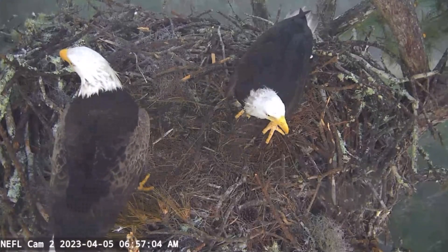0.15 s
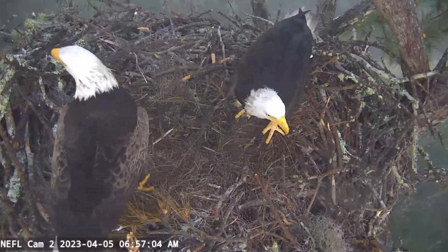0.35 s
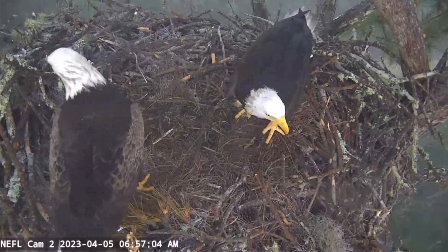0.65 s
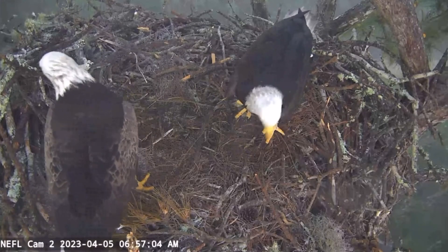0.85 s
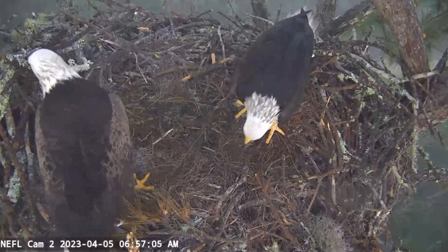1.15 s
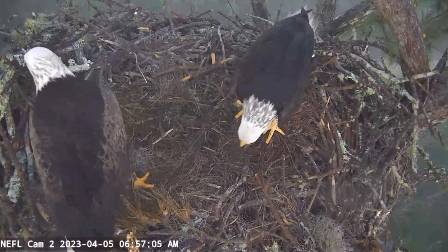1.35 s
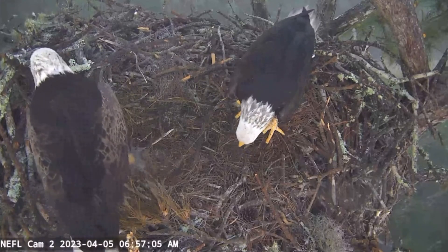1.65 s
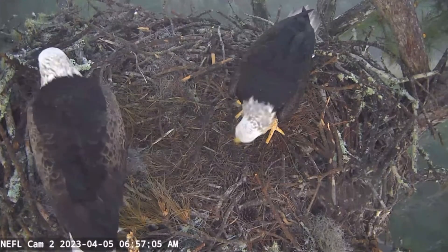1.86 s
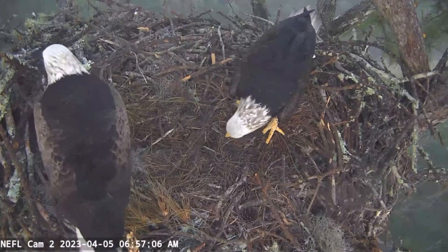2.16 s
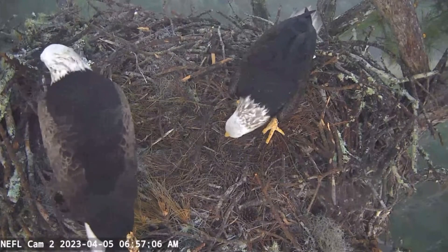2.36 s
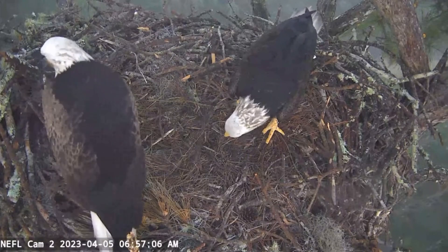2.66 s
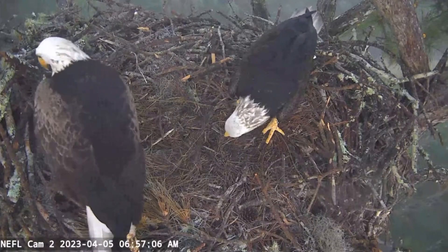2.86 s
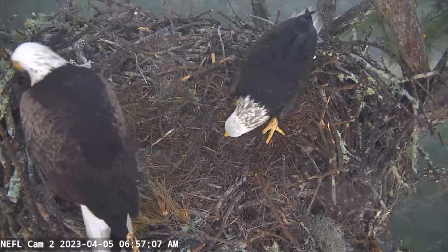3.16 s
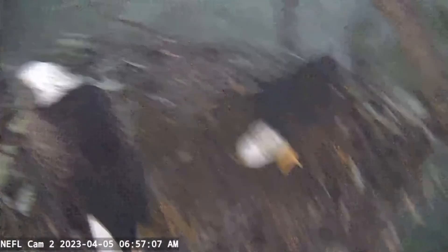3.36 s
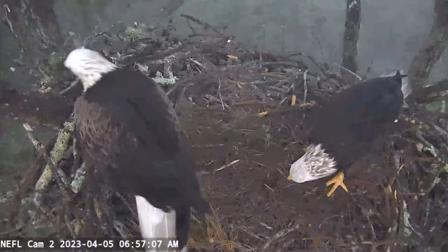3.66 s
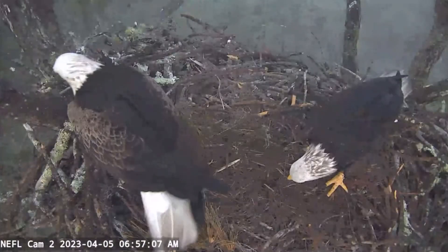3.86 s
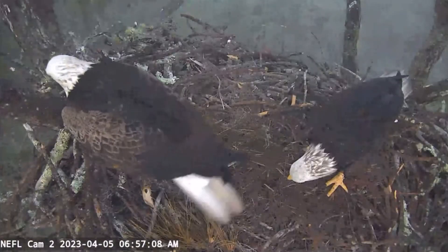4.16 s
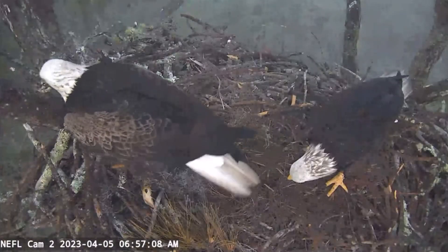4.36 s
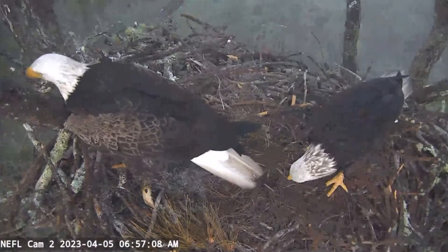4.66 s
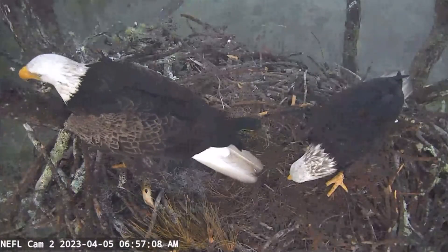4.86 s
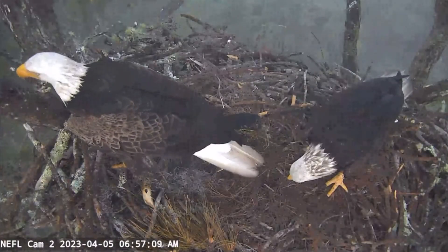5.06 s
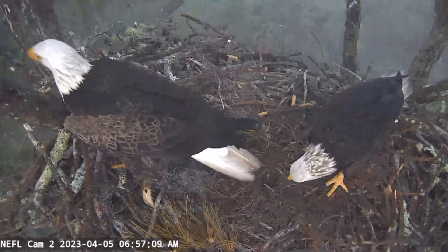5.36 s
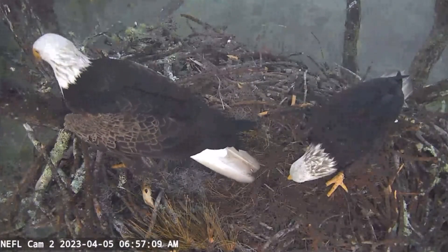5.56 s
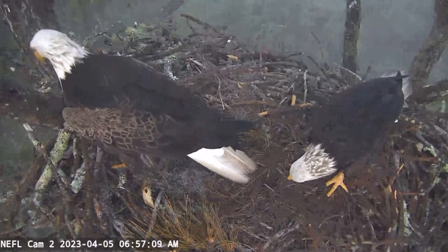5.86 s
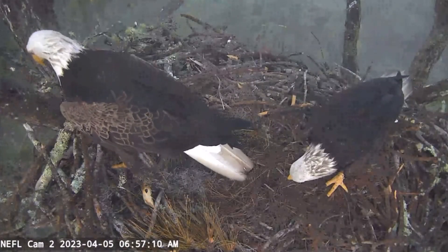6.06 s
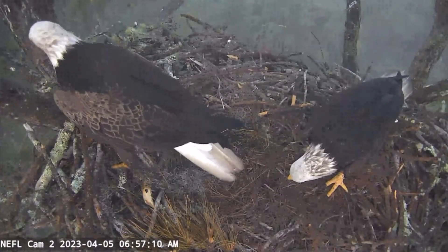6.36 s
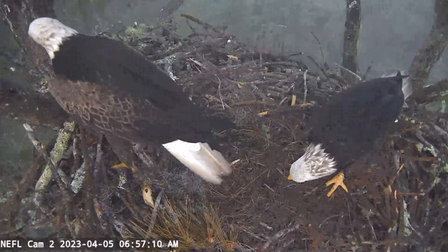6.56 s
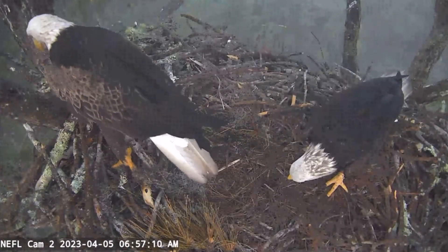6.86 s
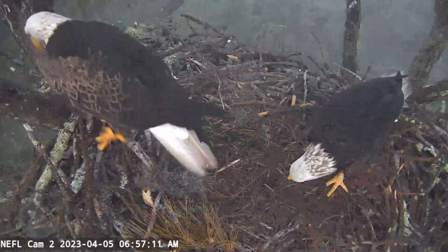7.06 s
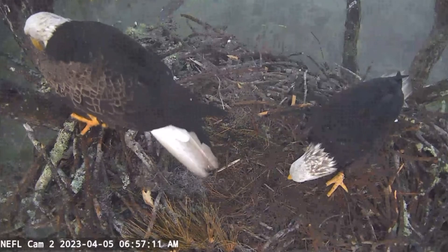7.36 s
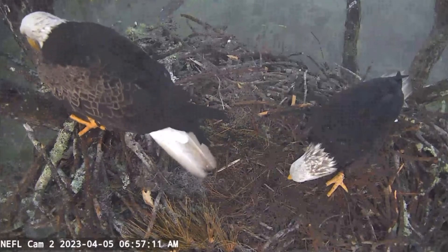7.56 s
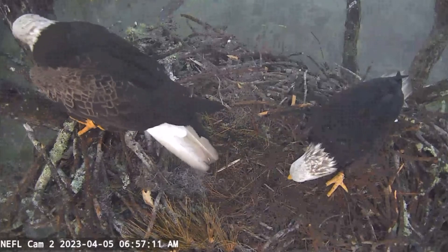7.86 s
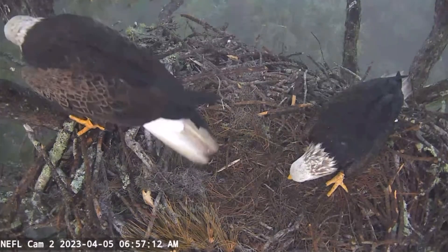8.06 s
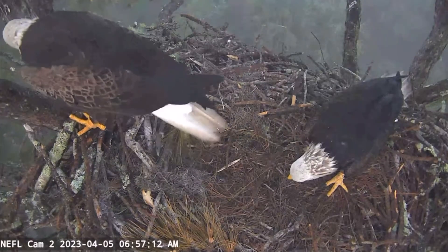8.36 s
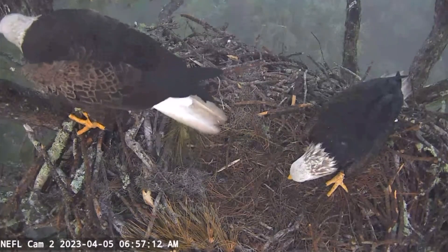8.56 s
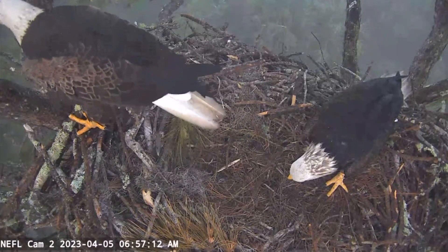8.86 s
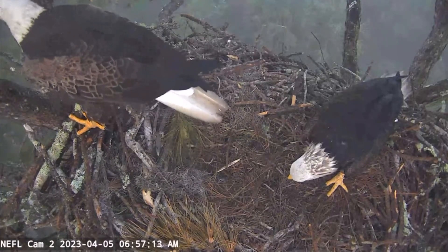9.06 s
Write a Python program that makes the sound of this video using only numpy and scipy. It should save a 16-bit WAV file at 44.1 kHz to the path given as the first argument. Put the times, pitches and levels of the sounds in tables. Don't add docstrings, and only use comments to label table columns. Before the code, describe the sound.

A stick nest in misty trees, heard from a close outdoor microphone over steady low engine hum, distant traffic rumble, thin insect hiss and faint electronic noise. From 0.3 to 2.1 seconds a near small bird repeats a quick phrase of short gliding whistles about four times a second, lightly echoing, with a fainter singer behind. Dry twigs click and snap around 1.4 seconds, and again softly near 2.7. From 2.2 to 3.8 distant, wetter phrases and level pipes answer; then it is sparse, a passing vehicle's soft drone swelling. Around 5 a faint singer returns, and from 6.4 to 8.2 the bright near phrases resume. Between 6.5 and 7.4 the large eagle shifts its feet: dense twig cracks and hollow knocks, strongest near 7, scraping fibres, and deep wing-air thumps at 6.7 and 7.3, with low buffeting fading by 8.2. Far whistles finish over the hum.

```python
import sys
import numpy as np
from scipy import signal
from scipy.fft import rfft, irfft, next_fast_len
from scipy.io import wavfile
from scipy.ndimage import uniform_filter1d, map_coordinates

SR = 44100
rng = np.random.default_rng(int(sys.argv[2]) if len(sys.argv) > 2 else 0)


def boost_factor(decibels):
    exponent = np.asarray(decibels, float) / 20
    return 10 ** exponent


def generate_wav(sig):
    pcm = np.round(np.clip(np.atleast_2d(sig).T, -1, 1) * 32767).astype(np.int16)
    wavfile.write(sys.argv[1], SR, pcm)


N = 406602
T = np.arange(N) / SR

# t from mark/ms, length/ms, start f/Hz, end f/Hz, peak level/dB
NEAR_PHRASE = [
    (-117, 14, 3700, 3400, -7),
    (-109, 19, 3150, 2480, -11),
    (-76, 29, 2170, 2510, -7),
    (-15, 31, 2530, 2870, 0),
    (40, 26, 2240, 1960, -10),
    (54, 30, 2070, 1620, -10),
]
MID_PHRASE = [
    (-52, 27, 2950, 2670, -6),
    (-10.5, 17.7, 3490, 3120, 0.5),
    (56.5, 40, 4050, 3620, -9.5),
    (89, 36.5, 3640, 4400, -13),
    (124, 30, 4450, 2950, 0),
    (154, 19, 2850, 2350, -18),
    (200.5, 63, 2220, 2050, -6.5),
]
FAR_PHRASE = [
    (-150, 20, 3660, 3850, -3),
    (-133, 48, 3900, 4230, -10.5),
    (-24, 32, 3050, 3390, -1),
    (8, 44, 3380, 2730, -3),
    (95, 65, 2430, 2680, -12),
]
# t/s, level/dB, opening note level/dB
NEAR_MARKS = [(0.347, -31, -9), (0.616, -28.5, -3), (0.877, -29.5, 0), (1.14, -29, -0.5), (1.408, -28.5, 2),
              (1.673, -28.5, 0.5), (1.945, -29.5, 0), (6.414, -32, -10), (6.679, -28.5, 3),
              (6.94, -28.5, 3), (7.204, -29, 3.5), (7.468, -28.5, -0.5), (7.738, -28, 1.5),
              (8.006, -29, -0.5)]
MID_MARKS = [
    (.148, -45.5, -4),
    (.53, -43, 1),
    (.915, -42.5, -6),
    (4.997, -47.5, 2),
    (5.385, -44, 2),
    (5.773, -43, 1),
    (6.161, -43.5, 1),
    (6.56, -46, -7),
]
FAR_MARKS = [
    (2.256, -50, -3),
    (2.629, -47, -1),
    (3.003, -47, -4),
    (3.38, -48.5, -2),
    (8.245, -49.5, -1),
    (8.615, -47.5, 0.5),
    (8.984, -46.5, 0),
]
# t/s, length/s, start f/Hz, end f/Hz, level/dB
WHISTLES = [
    (.02, 0.053, 3350, 3650, -52),
    (.08, 0.019, 3100, 2300, -47),
    (.095, 0.029, 2490, 2600, -47.5),
    (2.1, 0.021, 3900, 3500, -54),
    (5.17, 0.043, 3500, 4000, -58),
    (.68, .07, 6500, 7000, -62.5),
    (.86, .08, 6900, 6500, -66),
    (2.67, .06, 2600, 2200, -51),
    (0.883, 0.032, 3220, 3170, -49),
    (4.081, .04, 3020, 2790, -64),
]
# (length/s, start f/Hz, end f/Hz), then rows of t/s, level/dB
CALLERS = [
    ((0.081, 3050, 3045), [(2.41, -55.5), (2.655, -51.5), (2.885, -52), (3.135, -53.5), (7.285, -58)]),
    ((0.025, 3070, 2950), [(0, -48.5), (2.165, -48), (2.568, -51)]),
    ((0.049, 1560, 1830), [(.355, -47), (1.11, -46), (1.507, -44)]),
    ((.09, 3600, 3300), [(5.075, -58), (5.6, -57), (6.11, -58)]),
    ((.06, 7100, 7280), [(3.88, -63), (4.04, -63)]),
    ((.032, 4080, 3800), [(1.79, -55), (7.8, -56)]),
]
# peak position/share of length, end level below peak/dB, linger at top f (1 = straight)
NEAR_SWELL, MID_SWELL, FAR_SWELL = (.52, 19, 1.35), (.6, 8, .65), (.45, 5, 1.3)

# t/s, peak level/dB, ring f/Hz, brittleness/dB
SNAPS = [(1.022, -45, 1300, 2), (1.3534, -36, 1340, -1), (1.4397, -29, 2100, -5), (1.4442, -33, 1410, 1),
         (1.4657, -25, 2370, 3.5), (1.4656, -23.5, 1310, -22), (2.6408, -27.5, 2150, -11),
         (2.844, -35, 1520, -5), (2.8527, -40, 1350, 0), (2.935, -47, 1240, 5), (6.3515, -35, 1500, -16),
         (6.5595, -35, 1520, -7), (6.6472, -32.5, 1420, 9.5), (6.6677, -25, 1480, -11),
         (6.6731, -31, 1570, -13), (6.6784, -23, 1460, -10), (6.792, -19, 1235, -26),
         (6.81, -19.5, 1310, -17), (6.8996, -18.5, 1390, -20), (6.949, -18.5, 1320, -6),
         (6.9862, -24, 1400, -13), (6.9924, -30, 1250, -18), (7.0043, -16.5, 1210, -10),
         (7.22, -26, 1310, -18), (7.3484, -45, 1370, 2)]
# t/s, level/dB
SCRAPE = [
    (6.3, -79),
    (6.62, -61),
    (6.65, -52),
    (6.69, -53),
    (6.75, -61),
    (7.02, -59),
    (7.2, -62),
    (7.95, -63),
    (8.1, -80),
]
STAMP_S, STAMP_WIDE_S, STAMP_DB = 6.95, 0.12, 8.5
CRACK_DB, CRACK_GROWTH, KNOCK_DB = -19.5, .48, -15
THIN_HZ, THIN_SPAN_HZ = 2000, 400

# t/s, pressure/full scale, stroke length/s
STROKES = [
    (6.73, 0.25, .16),
    (6.835, -0.066, 0.17),
    (7.209, -0.15, .15),
    (7.287, 0.29, 0.048),
    (7.371, 0.12, 0.25),
]
# t/s, level/dB
BUFFET = [
    (6.6, -60),
    (7.05, -34.5),
    (7.2, -25.5),
    (7.3, -26),
    (7.4, -35),
    (7.6, -41),
    (8, -38),
    (8.2, -62),
]

# order/1, level/dB
ENGINE_ORDERS = [(1, 1), (2, -18), (3, 0), (6, -17), (9, -17), (18, -21.5)]
ENGINE_HZ, ENGINE_DB = 32.55, -37
# f/Hz, level/dB
MACHINE_TONES = [(77, -50.5), (114, -54), (166, -57)]
# t/s, f/Hz, level/dB
PASSING = [
    [(0, 222, -47), (.8, 237.7, -54), (1.8, 250, -55.5)],
    [(1.8, 188, -64), (3, 196.2, -67), (5.5, 206.5, -52), (7.6, 229.4, -60)],
]

# f/Hz, level per Hz/dB
RUMBLE = [(5, -11), (20, 0), (45, -4.5), (75, -2), (130, -7.5), (220, -8), (330, -18), (500, -38)]
TRAFFIC = [(180, -29), (300, -8), (350, -4.5), (378, -4), (415, -4.5), (598, -2.5), (786, -1), (1010, -9),
           (1370, -1.5), (1840, -13.5), (2300, -33), (2990, -48), (5060, -120)]
INSECTS = [(2530, -35), (4300, -9), (4710, -1.5), (5280, 3), (5570, -1), (6200, -9), (8060, -14),
           (13600, -120)]
HISS = [(1500, -26), (2100, -2.5), (2800, 0.5), (3400, -4.5), (4300, -9.5), (6300, -21.5), (9000, -15),
        (12700, -20.5), (13300, -19), (14200, -29)]
RUMBLE_DB, RUMBLE_FADE_DB_PER_S, TRAFFIC_DB, INSECT_DB = -40, 0.22, -43, -57

# f/Hz, threshold re usual level/dB
GATE = [(6000, -9), (9000, -4), (11000, -2.5), (12800, -1.5), (13150, .5), (13500, 2.5), (14000, 4.5),
        (14400, 10)]


def unit(x):
    return x / np.sqrt(np.mean(x ** 2) + 1e-20)


def curves(rows):
    s, *cols = np.transpose(rows)
    return [np.interp(T, s, c) for c in cols]


def wobble(rate_hz):
    coarse = T[::32]
    knots = rng.standard_normal(int(N * rate_hz / SR) + 4)
    return np.interp(T, coarse, map_coordinates(knots, [coarse * rate_hz]))


def band(x, lo_hz, hi_hz):
    return signal.sosfilt(signal.butter(2, [lo_hz, hi_hz], "band", fs=SR, output="sos"), x)


def rush(spectrum, patchy_db):
    z = signal.stft(rng.standard_normal(N + 8192), nperseg=512)[2]
    field = uniform_filter1d(rng.standard_normal(z.shape), size=6, axis=0)
    field = uniform_filter1d(field, size=12, axis=1)
    x = signal.istft(z * boost_factor(patchy_db * unit(field)), nperseg=512)[1]
    m = next_fast_len(len(x))
    hz, db = np.transpose(spectrum)
    log_hz = np.log(np.fft.rfftfreq(m, 1 / SR) + 1)
    gain = boost_factor(np.interp(log_hz, np.log(hz + 1), db, left=-120, right=-120))
    return unit(irfft(rfft(x, m) * gain, m)[:N])


def add(out, s, x):
    part = out[max(round(s * SR), 0):][:len(x)]
    part += x[:len(part)]


def whistle(s, hz, db, fade_s=.003):
    t = np.arange(s[0], s[-1], 1 / SR)
    edge = np.clip(np.minimum(t - s[0], s[-1] - t) / fade_s, 0, 1)
    glide_hz = uniform_filter1d(np.interp(t, s, hz), size=130, mode="nearest")
    return edge * boost_factor(np.interp(t, s, db)) * np.sin(2 * np.pi * np.cumsum(glide_hz) / SR)


def wren(phrase, marks, swell, opening_count):
    beamed, spread = np.zeros((2, N))
    peak, end_db, linger = swell
    u = np.linspace(0, 1, num=12)
    peak = np.clip(peak, .1, .9)
    from_peak = np.where(u < peak, (peak - u) / peak, (u - peak) / (1 - peak))
    shape_db = -end_db * from_peak ** 1.7
    for mark_s, db, opening_db in marks:
        variation = rng.standard_normal((len(phrase), 2))
        for k, (ms, length_ms, hz_a, hz_b, stroke_db) in enumerate(phrase):
            tune, force_db = variation[k]
            effort_db = db + force_db + opening_db * (k < opening_count)
            below_top = (u if hz_a > hz_b else 1 - u) ** linger
            glide_hz = max(hz_a, hz_b) - abs(hz_b - hz_a) * below_top
            glide_hz = glide_hz * (1 + .005 * tune)
            level_db = stroke_db + shape_db
            even_db = .6 * level_db - 3 * (k == 0)
            s, points_s = mark_s + ms / 1000, u * length_ms / 1000
            add(beamed, s, whistle(points_s, glide_hz, effort_db + level_db))
            add(spread, s, whistle(points_s, glide_hz, effort_db + even_db))
    return beamed, spread


def birds():
    near, near_spread = wren(NEAR_PHRASE, NEAR_MARKS, NEAR_SWELL, opening_count=2)
    mid, mid_spread = wren(MID_PHRASE, MID_MARKS, MID_SWELL, opening_count=1)
    far = wren(FAR_PHRASE, FAR_MARKS, FAR_SWELL, opening_count=2)[0]
    repeats = [(s, *call, db) for call, times in CALLERS for s, db in times]
    for s, length_s, hz_a, hz_b, db in WHISTLES + repeats:
        add(far, s, whistle([0, length_s], [hz_a, hz_b], [db, db], fade_s=0.0083))
    far *= boost_factor(2.2 * wobble(70))
    direct = near * boost_factor(wobble(110)) + mid * boost_factor(1.2 * wobble(80)) + far
    near_echo = forest(near_spread, t60_s=0.61, wet_db=-7.0, gap_s=.008)
    far_echo = forest(boost_factor(-10.0) * mid_spread + far, t60_s=0.79, wet_db=-3.0, gap_s=.012)
    return direct + near_echo + far_echo


def twigs():
    out, t = np.zeros(N), np.arange(SR // 8) / SR
    for s, db, hz, brittle_db in SNAPS:
        weight_db = STAMP_DB * np.exp(-((s - STAMP_S) / STAMP_WIDE_S) ** 2)
        noise = rng.standard_normal((2, len(t)))
        noise[:, 4] += 3.5
        thickness = np.clip((THIN_HZ - hz) / THIN_SPAN_HZ, 0, 1)
        ring_hz = hz * (.9 + .3 * thickness * np.exp(-t / .004))
        ring = boost_factor(-60 * t / .028) * (1 - np.exp(-t / .0005)) * np.sin(2 * np.pi * np.cumsum(ring_hz) / SR)
        knock = boost_factor(KNOCK_DB + weight_db - 60 * t / 0.052) * (1 - np.exp(-t / 0.00098))
        knock *= np.sin(2 * np.pi * 830 * t)
        body = boost_factor(brittle_db - 60 * t / 0.011) * unit(band(noise[0], 1000, 3500))
        crack_db = CRACK_DB + CRACK_GROWTH * brittle_db + weight_db
        crack = boost_factor(crack_db - 60 * t / .014) * unit(band(noise[1], 4400, 7800))
        add(out, s, boost_factor(db) * (ring + knock + body + crack))
    fibres = (rng.random(N) < .1) * boost_factor(4 * rng.standard_normal(N)) * rng.standard_normal(N)
    scrape = boost_factor(curves(SCRAPE)[0] + 4.3 * wobble(54)) * unit(band(fibres, 900, 6100))
    return out + scrape + forest(out, t60_s=0.054, wet_db=-11.0, gap_s=.003)


def wing():
    pushes = np.zeros(N)
    for s, pressure, length_s in STROKES:
        u = (T - s) / length_s
        pushes += -pressure * np.sin(2 * np.pi * u) * np.exp(-(2.27 * u) ** 2)
    turbulence = rush([(8, 7), (45, -2), (80, -6.5), (170, -19), (240, -55)], patchy_db=1.1)
    return pushes + boost_factor(curves(BUFFET)[0] + 1.5 * wobble(14)) * turbulence


def forest(x, t60_s, wet_db, gap_s):
    out, t, step = np.zeros(N), np.arange(SR // 2) / SR, SR // 3
    for a in range(0, N, step):
        tail = rng.standard_normal(len(t)) * boost_factor(-60 * t / t60_s)
        block = x[a:a + step]
        if block.any():
            echo = signal.fftconvolve(block, tail / np.linalg.norm(tail))
            add(out, a / SR + gap_s, boost_factor(wet_db) * echo)
    return out


def hum():
    out, turn = np.zeros(N), 2 * np.pi * ENGINE_HZ * T
    for order, db in ENGINE_ORDERS:
        level = boost_factor(ENGINE_DB + db + 1.6 * wobble(11))
        out += level * np.sin(order * (turn + .04 * wobble(8)))
    for hz, db in MACHINE_TONES:
        out += boost_factor(db + 3 * wobble(3)) * np.sin(2 * np.pi * hz * T + 1.2 * wobble(2))
    passing = np.zeros(N)
    for path in PASSING:
        s, hz, db = np.transpose(path)
        octave_below = whistle(s, hz / 2, db + 3.5, fade_s=0.39)
        add(passing, s[0], whistle(s, hz, db, fade_s=0.079) + octave_below)
    return out + boost_factor(3 * wobble(4.5)) * passing


def air():
    rumble_db = RUMBLE_DB - RUMBLE_FADE_DB_PER_S * T + 0.68 * wobble(1.5)
    rumble = boost_factor(rumble_db) * rush(RUMBLE, patchy_db=0.4)
    traffic = boost_factor(TRAFFIC_DB + 0.5 * wobble(3.0)) * rush(TRAFFIC, patchy_db=0.84)
    insects = boost_factor(INSECT_DB + 0.72 * wobble(6)) * rush(INSECTS, patchy_db=0.8)
    hiss = boost_factor(-55.5) * rush(HISS, patchy_db=1.3)
    whine_spectrum = [(12880, -22), (12940, -5), (12960, 0), (12985, -5), (13050, -22)]
    whine = boost_factor(-72.5) * rush(whine_spectrum, patchy_db=.5)
    return rumble + traffic + insects + hiss + whine


def scene():
    return (birds() + twigs() + wing() + hum() + air())[None]


def low_pass(x):
    return signal.sosfilt(signal.butter(12, 14480, fs=SR, output="sos"), x)


def record(dry):
    mono = signal.sosfilt(signal.butter(8, 14300, fs=SR, output="sos"), dry[0])
    hz, _, z = signal.stft(mono, SR, "cosine", nperseg=2048)
    power = uniform_filter1d(abs(z) ** 2, size=6, axis=0)
    usual = signal.medfilt(np.median(power, axis=1), kernel_size=41)
    limit = usual * boost_factor(2 * np.interp(hz, *np.transpose(GATE), left=-60))
    kept = signal.istft(z * (power > limit[:, None]), SR, "cosine", nperseg=2048)[1]
    return low_pass(kept[None, :N])


dry = scene()
out = record(dry)
generate_wav(out)
```